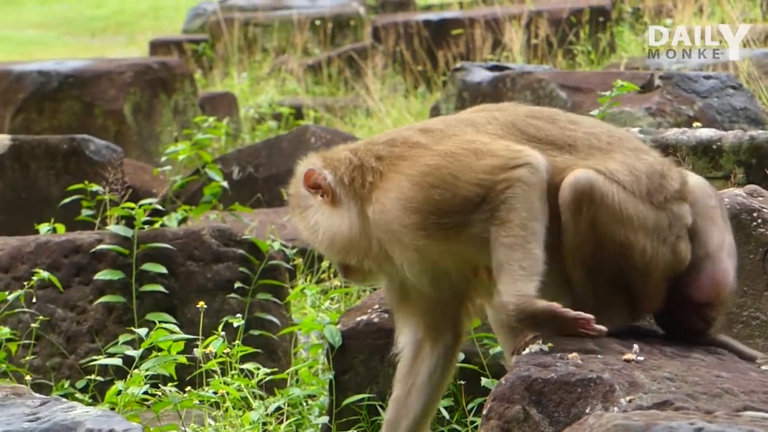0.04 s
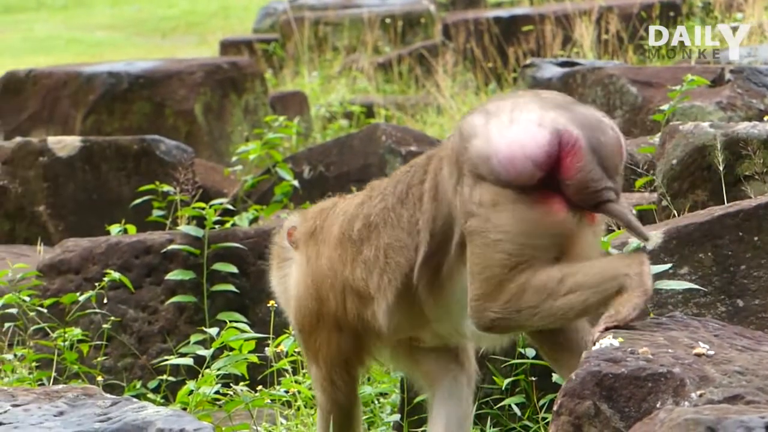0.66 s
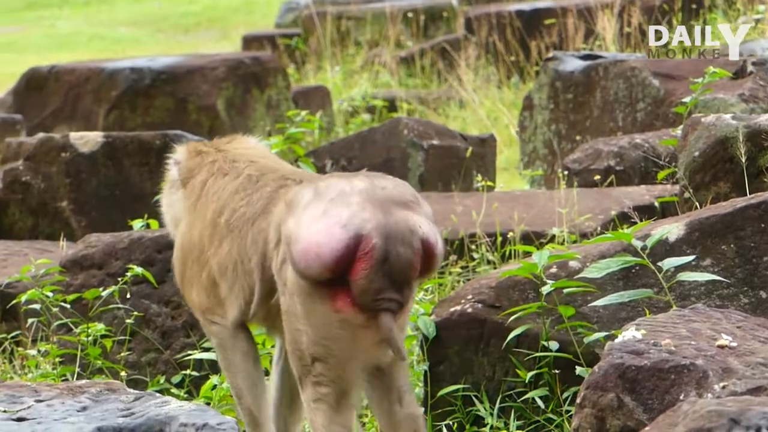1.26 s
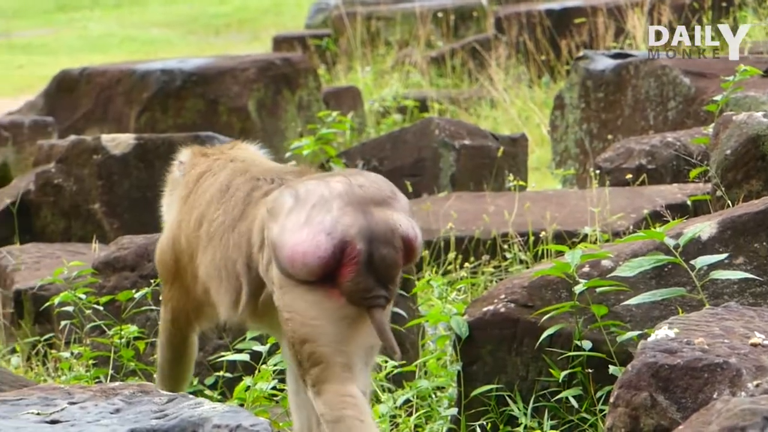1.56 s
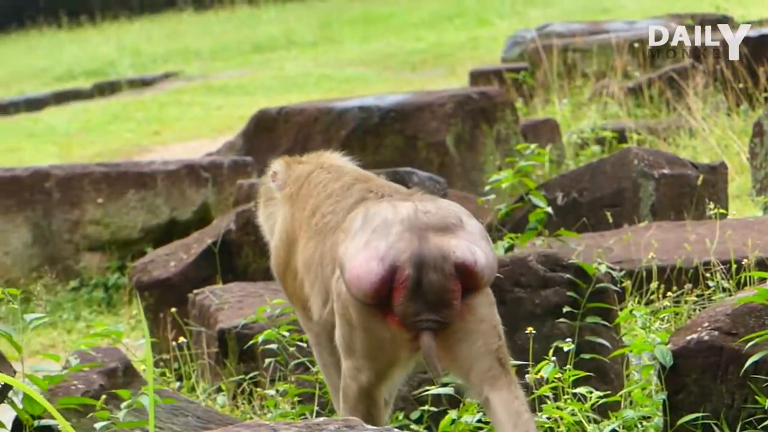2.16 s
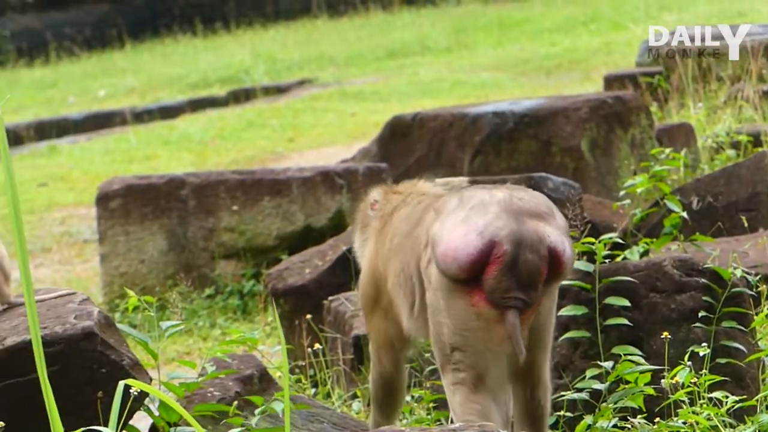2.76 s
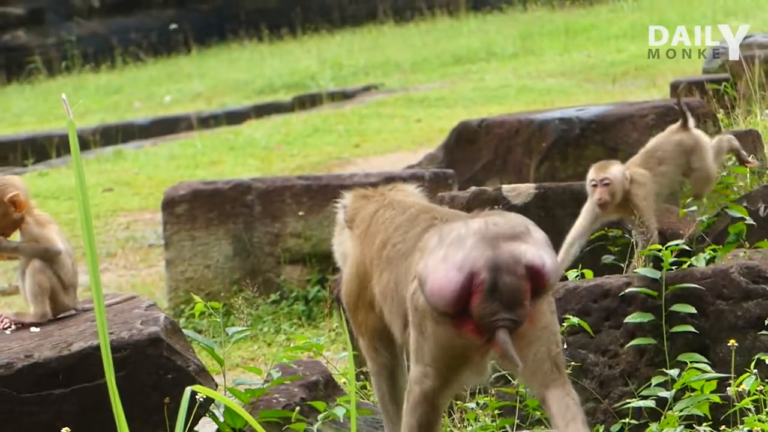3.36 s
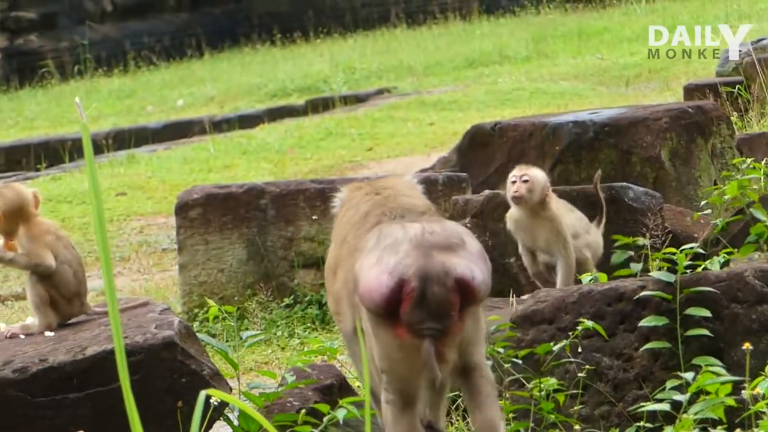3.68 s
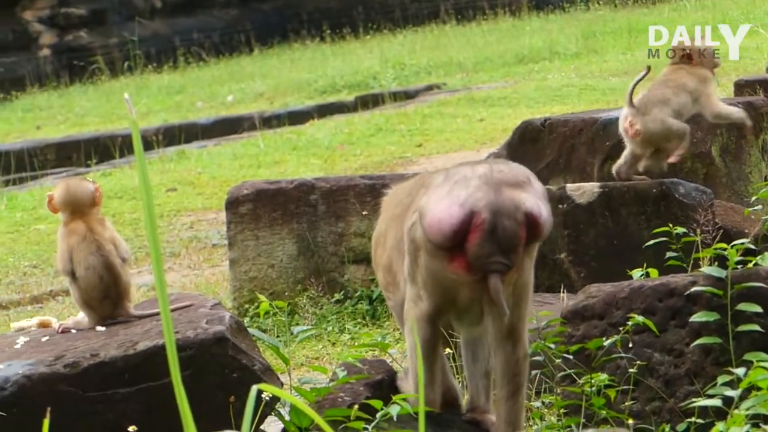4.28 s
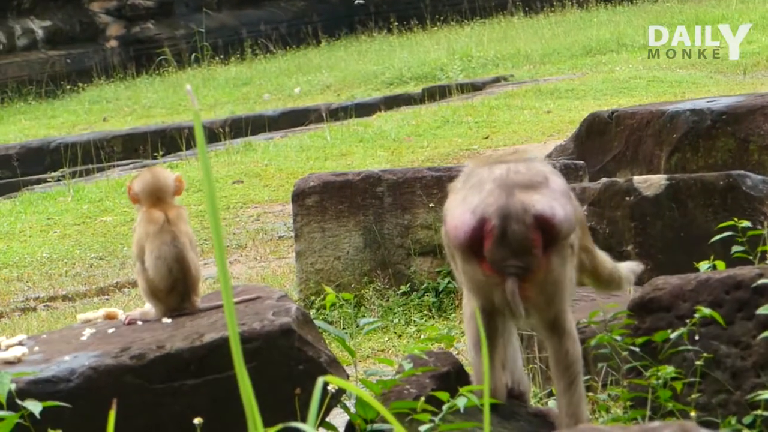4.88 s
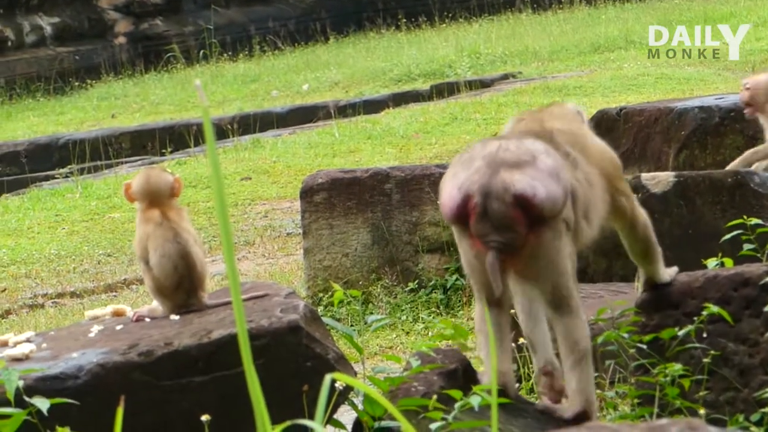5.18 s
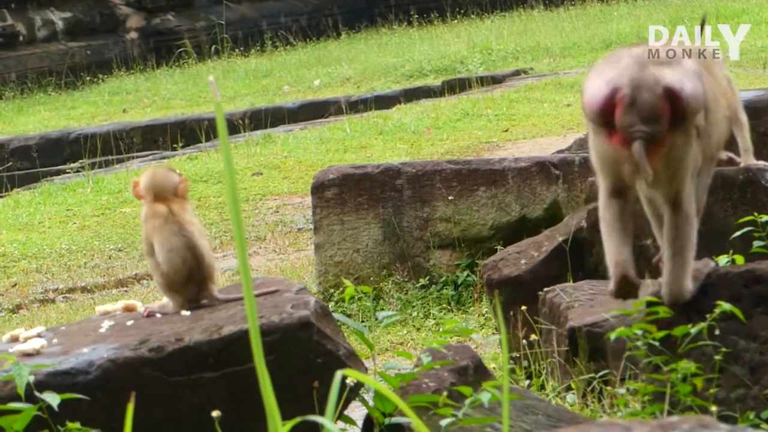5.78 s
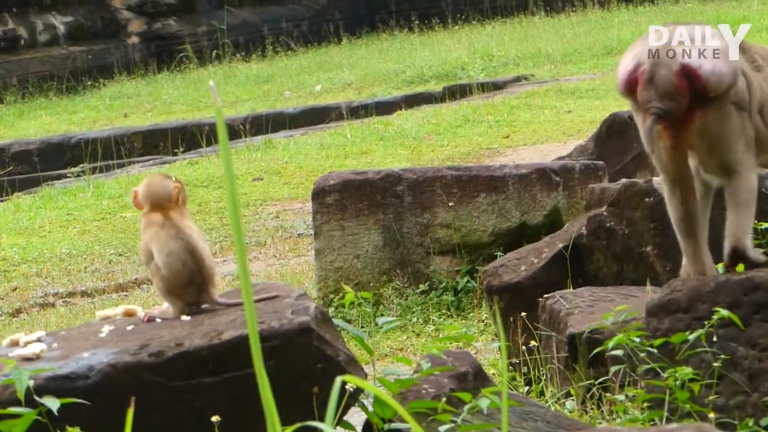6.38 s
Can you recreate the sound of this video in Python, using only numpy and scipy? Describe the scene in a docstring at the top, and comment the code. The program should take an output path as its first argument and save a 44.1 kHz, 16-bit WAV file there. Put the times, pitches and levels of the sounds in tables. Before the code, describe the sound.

Faint rustling and light knocks on stone open a quiet outdoor scene. About two seconds in, a young monkey gives a shrill, wavering whine, then a louder, rough scream, followed after a pause by three short, piercing cries. Other monkeys move softly through weeds, and a twig cracks sharply during the scream and again near the end. Everything sits near the centre, fairly close, with a brief echo from stone blocks and a steady soft hush behind.

```python
"""A young macaque squeals five times among stone blocks in a grassy ruin. Its whistle-high voice arches,
flares as it glides through the mouth's resonances, turns rough under strain and breaks into rasps.
Other monkeys knock on loose stones, snap twigs and brush through weeds; faint calls come from far off.
The blocks and far walls echo over a quiet hush of leaves and air."""
import sys
import numpy as np
from scipy import signal
from scipy.fft import rfft, irfft, next_fast_len
from scipy.io import wavfile
from scipy.ndimage import uniform_filter1d, map_coordinates

SR = 44100
rng = np.random.default_rng(int(sys.argv[2]) if len(sys.argv) > 2 else 0)


def store_pcm(level_fs):
    """Save levels as 16-bit WAV."""
    pcm = np.round(np.clip(level_fs, -1, 1) * 32767).astype(np.int16)
    wavfile.write(sys.argv[1], SR, np.atleast_2d(pcm).T)


N = 284058


def squeals(jitter=0.0073, rough_jitter=0.01, flutter=1.87, hiss_db=-14.5, split_hz=250, hoarse=0.68):
    """Tight vocal folds whistle; under strain the pitch shakes and splits into side tones and hiss."""
    # pitch curves of the voice: t/s, f/Hz
    whine = [(1.91, 6920), (1.94, 9210), (1.972, 9400), (1.997, 8350), (2.08, 11830), (2.135, 12850),
             (2.21, 10680), (2.252, 10290), (2.285, 7100)]
    whimper = [(2.322, 8800), (2.342, 9300), (2.368, 8200)]
    scream = [(2.618, 9700), (2.675, 13470), (2.725, 14200), (2.755, 13300), (2.805, 10340), (2.89, 10780),
              (2.915, 10030), (2.942, 10350), (3.005, 11950), (3.05, 12670), (3.073, 12110), (3.116, 7850)]
    cry = [(4.138, 10620), (4.15, 10800), (4.175, 12590), (4.21, 12150), (4.225, 13900), (4.255, 14200),
           (4.28, 13560), (4.312, 11400), (4.33, 9120), (4.35, 9010)]
    cry_second_pitch = [(4.215, 11950), (4.285, 12660)]
    cry_undertone = [(4.11, 6370), (4.15, 7230)]
    yelp = [(4.928, 9600), (4.972, 8985), (5.004, 7290)]
    shriek = [(5.36, 10900), (5.398, 10600), (5.42, 11300), (5.436, 10700), (5.462, 6200)]
    # stretches of voice: pitch curve, relative level/dB, swell/(dB per s), roughness/0-1
    stretches = [(whine, -32.5, 35, 0.087), (whimper, -34, 57, .1), (scream, -22.5, 5, .11),
                 (cry, -31, 28, .35), (cry_second_pitch, -48, -50, 0.24), (cry_undertone, -50.5, 0, 0.16),
                 (yelp, -20, -72, .05), (shriek, -21.5, 0, .11)]
    # brief strains of the voice: t/s, half width/s, level change/dB, added roughness/0-1
    strains = [(1.91, 0.021, -2, .6), (2.252, 0.01014, 10, 0), (2.278, .014, -5.5, 0.14),
               (2.654, .018, 2, 0.14), (2.787, 0.026, 4.5, 0.43), (2.83, 0.0086, -4.5, 0.54),
               (2.88, 0.038, 1.5, 0.6), (2.942, .018, 5.5, 0.19), (2.984, 0.023, -3.5, 0.2),
               (3.091, 0.0068, 9.5, 0), (4.145, 0.012, -2, 0.31), (4.927, 0.0069, -1, 0.6),
               (4.97, 0.017, 6.5, 0), (5.36, 0.0091, 1, .45), (5.434, 0.0049, -10.5, 0)]
    # how well the mouth sends out each pitch: f/Hz, gain/dB
    mouth_gains = [(6500, 4.5), (7600, -16), (8300, -10.5), (9000, -1.5), (9450, -8), (9800, -7.5),
                   (10350, 0.5), (10800, -0.5), (11300, -9), (12200, 1), (13450, -13), (14200, -0.5)]
    # side tones of a rough voice: multiple of the pitch, relative level/dB
    side_tones = [(0.352, -36), (.64, -10.5), (1.27, -16.5)]
    # tone colour of the hiss in the voice: f/Hz, level/dB
    hiss_colour = [(800, -40), (2000, -18), (3800, -12), (5500, -14.5), (6700, -4), (8500, -18),
                   (11500, -3.5), (14000, 0.5), (15500, -14.5)]
    voice = np.zeros(N)
    for pitch, level_db, swell_db, rough in stretches:
        times, pitches = np.transpose(pitch)
        t = np.arange(times[0], times[-1], 1 / SR)
        hz, size = np.interp(t, times, pitches), len(t)
        db = level_db + swell_db * (t - t.mean())
        for at, width, push_db, push_rough in strains:
            push = np.exp(-((t - at) / width) ** 2)
            db = db + push_db * push
            rough = np.clip(rough + push_rough * push, 0, 1)
        mouth = amp(along(mouth_gains, hz))
        hz = hz * (1 + jitter * wobble(420, size) + rough_jitter * rough * wobble(800, size))
        whistle = mouth * sine(hz) * (1 + hoarse * rough * wobble(2400, size))  # uneven cycles fray it
        split = sum(amp(side_db) * sine(multiple * hz + split_hz * wobble(1500, size))
                    for multiple, side_db in side_tones)
        split = 2.4 * rough * filtered(split, throat)  # side tones stand out where the throat rings
        hiss = amp(hiss_db) * noise(lambda f: amp(along(hiss_colour, f)), size)
        fades = np.clip(np.minimum(t - times[0], times[-1] - t) / 0.0042, 0, 1)
        tremble = amp(flutter * (1.5 + .5 * rough) * wobble(189.6, size))
        add(voice, times[0], fades * tremble * amp(db) * (whistle + rough * (split + hiss)))
    return voice


def rasps(grain_db=2.5, rise_share=.45, slack_hz=3450, tense_hz=5500, slack_tilt=-17.5, tense_tilt=4.5):
    """Around a squeal the folds flap wildly and make the throat ring; tenser folds rasp higher."""
    # harsh bursts of the voice: peak t/s, length/s, relative level/dB, tension/0-1
    bursts = [(1.91, 0.044, -47.5, 0.8), (2.609, 0.026, -43, 0.42), (2.617, .016, -35, 1),
              (4.112, .05, -41.5, 1), (4.349, .03, -39, 0.19), (4.884, 0.06, -42, .05),
              (4.906, .03, -27.5, 0.8), (5.031, 0.036, -53, .1), (5.342, 0.022, -32, 0.51),
              (5.353, 0.036, -32, 0.9), (5.476, .03, -38.5, 0.2)]
    voice = np.zeros(N)
    for s, length, db, tension in bursts:
        rise = rise_share * length
        shape = swell(rise, length - rise)
        low_hz = slack_hz + tension * (tense_hz - slack_hz)
        tilt = slack_tilt + tension * (tense_tilt - slack_tilt)  # dB per octave
        brightness = lambda f: amp(tilt * np.log2(np.maximum(f, 4000) / SR))
        low_cut = lambda f: f ** 10 / (f ** 10 + low_hz ** 10)
        rasp = noise(lambda f: throat(f) * brightness(f) * low_cut(f), len(shape))
        rasp = unit(rasp * amp(grain_db * wobble(699, len(shape))))
        add(voice, s - 3 * rise, amp(db) * shape * rasp)
    return voice


def throat(f):
    """The small throat and mouth pass the frequencies at which they ring and weaken the rest."""
    # resonances of the throat: f/Hz, width/Hz, gain/dB
    rings = [(1650, 3900, -7.5), (3940, 620, -2.5), (6800, 1150, 0), (9700, 710, -3), (14200, 1900, -19)]
    return sum(amp(db) * np.abs(resonance(f, hz, width)) ** 2 for hz, width, db in rings)


def footfalls(stone_rise_s=0.003, twig_rise_s=.0009, paw_rise_s=0.0033, snap_db=1, grit=0.11):
    """Stones knock hollowly and rock back, twigs crack and splinter, soft paws thud in pairs."""
    # feet on loose stones: t/s, relative peak/dB, ring f/Hz
    knocks = [(1.571, -43.5, 950), (1.711, -44.5, 1030), (1.754, -44, 945), (1.868, -46.5, 750),
              (1.941, -46, 680), (2.001, -28.5, 1280), (2.496, -31, 762), (2.951, -34.5, 691.5),
              (5.758, -39.5, 740), (5.806, -46.5, 740)]
    # twigs snapping: t/s, relative peak/dB, ring f/Hz, splintering/0-1
    snaps = [(2.7942, -18.5, 2970, .25), (4.413, -41, 4600, .3), (4.8217, -44, 4520, 0.55),
             (5.9885, -41.5, 2580, 0.28), (6.0482, -17, 2540, 0.92), (6.2282, -44.5, 2200, .4),
             (6.3717, -31, 3120, 0.5)]
    # tone colour of a twig that rings at 2700 Hz: f/Hz, level/dB
    twig_colour = [(150, -49), (750, -7.5), (1100, -9.5), (1700, -6.5), (2700, 10), (3400, 2),
                   (4300, -17.5), (8000, -44), (15000, -50)]
    # fibres giving way after the first crack: delay/s, level change/dB
    splinters = [(.0077, -9.5), (.0215, -9.5)]
    # front paws landing on rock: t/s, relative peak/dB
    thuds = [(5.376, -30), (6.043, -34)]
    # tone colour of a paw's thud: f/Hz, level/dB
    paw_colour = [(40, -48.5), (100, -19), (170, -4.5), (290, 1), (430, -19.5), (650, -1.5), (1050, -31),
                  (1500, -7), (2400, -22.5), (5000, -65)]
    steps = np.zeros(N)
    t = np.arange(-SR // 40, SR // 8) / SR

    def blow(db, rise_s, colour, t60):
        """Grit builds up to a click, then drops 60 dB in t60 seconds; the struck thing colours it."""
        scrape = np.exp(np.minimum(t, 0) / rise_s) * amp(-60 * np.maximum(t, 0) / t60)
        click = t == 0
        sound = filtered(click + grit * rng.standard_normal(len(t)) * scrape, colour)
        return amp(db) * sound / np.abs(sound).max()

    for s, db, hz in knocks:
        stone = lambda f: np.abs(resonance(f, hz, .45 * hz)) ** 3
        for delay, drop_db in (0, 0), (.018, -20):  # the stone rocks back once
            add(steps, s + delay + t[0], blow(db + drop_db, stone_rise_s, stone, t60=0.032))
    for s, db, hz, splintering in snaps:
        twig = lambda f: amp(along(twig_colour, f * 2700 / hz))
        crack = lambda drop_db: blow(db + drop_db + snap_db, twig_rise_s, twig, t60=0.015)
        add(steps, s + t[0] + twig_rise_s, crack(0))
        for delay, drop_db in splinters:
            add(steps, s + delay + t[0] + twig_rise_s, splintering * crack(drop_db))
    paw = lambda f: amp(along(paw_colour, f))
    for s, db in thuds:
        for delay, drop_db in (0, 0), (.019, -6):  # the hind paws follow
            add(steps, s + delay + t[0] + paw_rise_s, blow(db + drop_db, paw_rise_s, paw, t60=0.044))
    return steps


def weeds(crackle_db=3, rise_share=.42):
    """Leaves hiss and crackle while the stems scrape lower down."""
    # bodies brushing the weeds: peak t/s, length/s, relative level/dB, share of leaves/0-1, stem f/Hz
    brushes = [(.06, 0.057, -62.5, 0.5, 385), (.14, 0.048, -53, 0.27, 2660), (0.758, .06, -53.5, 0.5, 393),
               (1.445, 0.073, -45.5, 0.92, 880), (1.878, 0.025, -49, 0.97, 596),
               (1.915, 0.071, -49, 0.82, 517), (1.999, 0.084, -45.5, 0.47, 970),
               (2.836, 0.15, -51, 0.92, 1530), (2.872, .05, -59.5, 0.4, 348),
               (3.376, 0.12, -61, 0.52, 1453), (3.607, .063, -60, 0.92, 900), (3.789, .04, -61.5, 0.1, 600),
               (4.29, 0.05, -63, 0.07, 420), (4.317, .12, -61.5, 0, 1760), (4.556, 0.054, -62.5, 0, 2450),
               (5.482, .036, -44, 0.4, 1578), (5.497, .15, -58, 0.74, 327), (5.764, .04, -50.5, 0, 690),
               (5.875, 0.037, -54.5, 0.29, 3150), (6.071, .04, -56, 0.01, 2700),
               (6.403, 0.092, -52.5, 0.11, 2920)]
    # tone colour of the leaves: f/Hz, level/dB
    leaf_colour = [(880, -48), (1500, -21), (2310, -8), (2520, 2), (4480, -0.5), (7670, -7.5), (9330, -4.5),
                   (11400, -7.5), (15500, -26)]
    rustle = np.zeros(N)
    for s, length, db, leafy, hz in brushes:
        rise = rise_share * length
        shape = swell(rise, length - rise)
        size = len(shape)
        leaves = np.sqrt(leafy) * noise(lambda f: amp(along(leaf_colour, f)), size)
        stems = np.sqrt(1 - leafy) * noise(lambda f: resonance(f, hz, 0.99 * hz) ** 2, size)
        crackle = unit(amp(crackle_db * wobble(395.4, size)))
        add(rustle, s - 3 * rise, amp(db) * shape * crackle * (leaves + stems))
    return rustle


def far_calls(shake=0.144):
    """Faint coos, squeaks and a whistle cross the grass; a shaking pitch makes some hoarse."""
    # calls of other animals: t/s, length/s, start f/Hz, end f/Hz, relative level/dB, roughness/0-1
    glides = [(0.438, 0.083, 426, 422, -62.5, 0.2), (.55, 0.08, 414, 470, -63.5, 0.2),
              (0.686, 0.096, 655, 564, -59.5, 0), (0.814, .05, 1284, 2380, -48, .9),
              (1.695, 0.11, 1795, 1780, -62, 0.01), (3.316, 0.108, 1650, 1390, -61.5, 0.68)]
    calls = np.zeros(N)
    for s, length, start_hz, end_hz, db, rough in glides:
        size = int(length * SR)
        glide = np.linspace(start_hz, end_hz, size)
        hz = glide * (1 + shake * rough * wobble(1794, size)) + 14 * wobble(194, size)
        add(calls, s, amp(db) * np.hanning(size) * sine(hz))
    return calls


def ruins(x, near_db, far_db, near_t60, side_db):
    """Nearby blocks scatter the sound at once; far walls and trees return a longer tail."""
    # how long the far echo lasts: f/Hz, time to fade by 60 dB/s
    echo_times = [(300, 0.37), (1500, 0.25), (4000, 0.29), (9500, 0.45), (15000, 0.21)]
    hz, t, spectra = signal.stft(rng.standard_normal((2, SR * 3 // 4)), SR, nperseg=256)
    far = signal.istft(spectra * amp(-60 * t / along(echo_times, hz)[:, None]), SR, nperseg=256)[1]
    t = np.arange(far.shape[1]) / SR
    far = far * (1 - np.exp(-t / 0.016))
    near = rng.standard_normal(far.shape) ** 3 * amp(-60 * t / near_t60) * (t > .002)  # spiky echoes
    walls = amp(near_db) * near / np.linalg.norm(near[0]) + amp(far_db) * far / np.linalg.norm(far[0])
    mid, side = signal.fftconvolve(x[None], walls, axes=1)[:, :N]
    return x + mid + amp(side_db) * np.array([side, -side])


def hush(gain_db=-1.5, side_db=-11, drift_db=0.86, patchy_db=3.0):
    """Far leaves and air murmur, ebbing in patches and nearly the same on both sides."""
    # tone colour of the hush: f/Hz, level/dB
    air_colour = [(15, -56), (25, -44.5), (75, -17.5), (140, 1), (193, -5), (221, -13.5), (313, -11),
                  (552, -5.5), (1530, -12), (2920, -10.5), (3720, -14), (5280, -12), (7700, -17.5),
                  (10100, -13.5), (15500, -23.5)]
    # its slow rise and fall: t/s, relative level/dB
    air_levels = [(0, -60.5), (.4, -62.5), (1.2, -61.5), (2.5, -61), (3.798, -63), (4.8, -62.5),
                  (5.401, -61), (6.44, -60)]
    colour = lambda f: amp(along(air_colour, f))
    spectra = signal.stft(np.array([noise(colour, N), noise(colour, N)]), nperseg=1024)[2]
    patches = uniform_filter1d(rng.standard_normal(spectra.shape[1:]), size=5, axis=0)  # across pitch
    patches = uniform_filter1d(patches, size=9, axis=1)  # across time
    mid, side = signal.istft(spectra * amp(patchy_db * unit(patches)), nperseg=1024)[1][:, :N]
    db = np.interp(np.arange(N) / SR, *np.transpose(air_levels)) + gain_db + drift_db * wobble(6.3, N)
    return amp(db) * (mid + amp(side_db) * np.array([side, -side]))


def amp(db):
    """Turn decibels into a gain."""
    return 10 ** (np.asarray(db) / 20)


def unit(x):
    """Scale a signal to an average strength (rms) of 1."""
    return x / np.sqrt(np.mean(x ** 2) + 1e-20)


def along(points, hz):
    """Read between (f/Hz, value) points on a log frequency axis."""
    f, values = np.transpose(points)
    return np.interp(np.log(hz + 1), np.log(f), values)


def wobble(rate, size):
    """A smooth curve through `rate` random points a second."""
    points = rng.standard_normal(int(size * rate / SR) + 4)
    return map_coordinates(points, [np.arange(size) * rate / SR])


def filtered(x, response):
    """Scale each frequency f in x by response(f)."""
    size = x.shape[-1]
    padded = next_fast_len(size + 4096)
    return irfft(rfft(x, padded) * response(np.fft.rfftfreq(padded, 1 / SR)), padded)[..., :size]


def noise(response, size):
    """Coloured noise of rms 1."""
    return unit(filtered(rng.standard_normal(size), response))


def sine(hz):
    """A tone of rms 1 that follows a pitch curve."""
    return np.sqrt(2) * np.sin(2 * np.pi * np.cumsum(hz) / SR)


def resonance(f, hz, width):
    """How something that rings at hz responds to frequency f."""
    return 1j * f * width / (hz * hz - f * f + 1j * f * width)


def swell(rise, fall):
    """A loudness curve that peaks three rise times after its start."""
    t = np.arange(-3 * rise, 4 * fall, 1 / SR)
    return np.exp(-np.where(t < 0, (t / rise) ** 2, np.abs(t / fall) ** 1.5))


def add(track, s, sound):
    """Mix a sound into the track from s seconds on."""
    start = max(round(s * SR), 0)
    track[start:start + len(sound)] += sound[:max(N - start, 0)]


def scene():
    """The macaque and its troop echo among the stones, slightly to the right, over the hush."""
    voice = amp(-2.0) * squeals() + amp(2.0) * rasps()
    monkey = ruins(voice, near_db=-4, far_db=-13.5, near_t60=0.11, side_db=-10.5)
    others = footfalls() + weeds() + far_calls()
    troop = ruins(others, near_db=-7.0, far_db=-15.5, near_t60=0.13, side_db=-6.0)
    return monkey * amp([[-.15], [.15]]) + troop * amp([[-.7], [.7]]) + hush()


def record(dry, top_hz=15700):
    """The highest treble droops, and everything above top_hz is cut."""
    droop = lambda hz: amp(along([(14300, -0.5), (15600, -7)], hz))
    return filtered(dry, lambda hz: droop(hz) * (hz < top_hz))


dry = scene()
out = record(dry)
store_pcm(out)
```